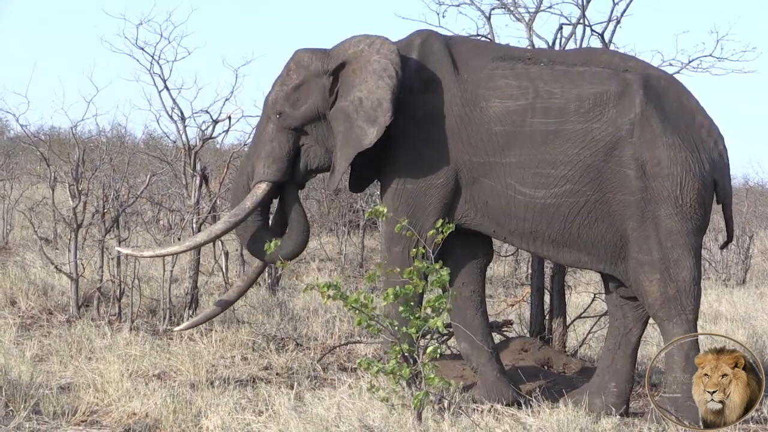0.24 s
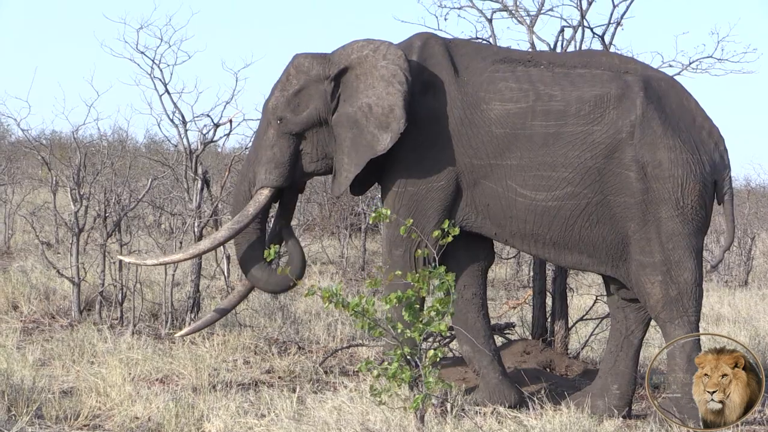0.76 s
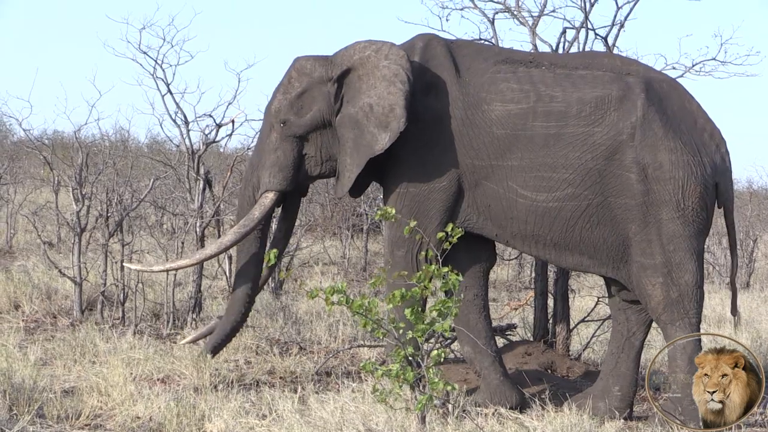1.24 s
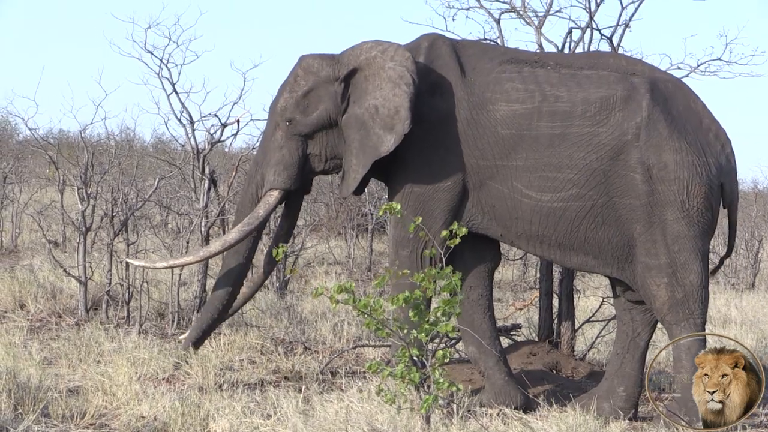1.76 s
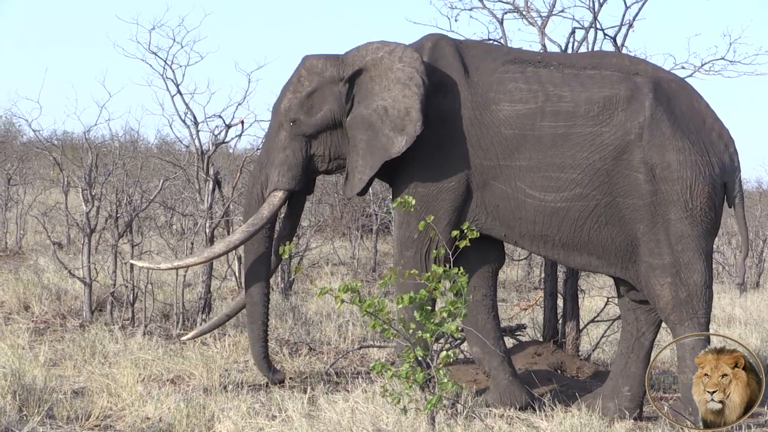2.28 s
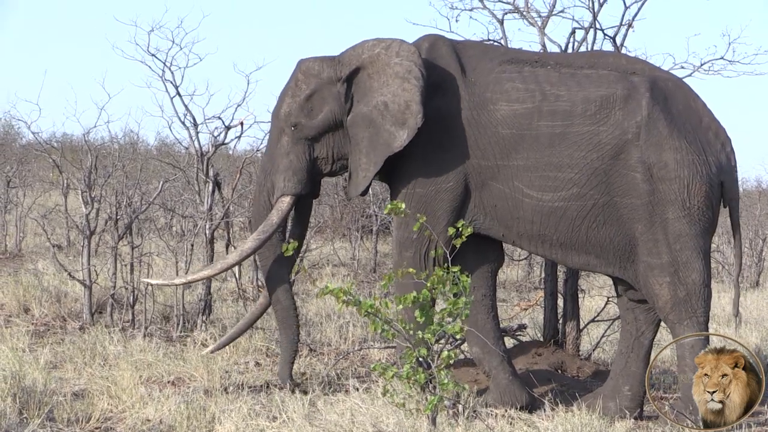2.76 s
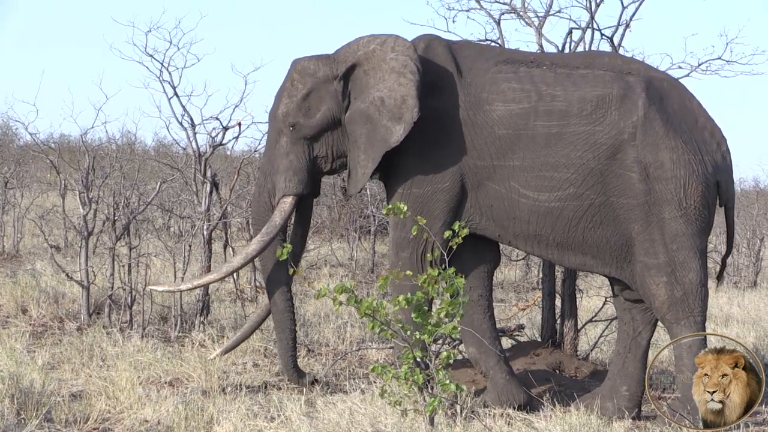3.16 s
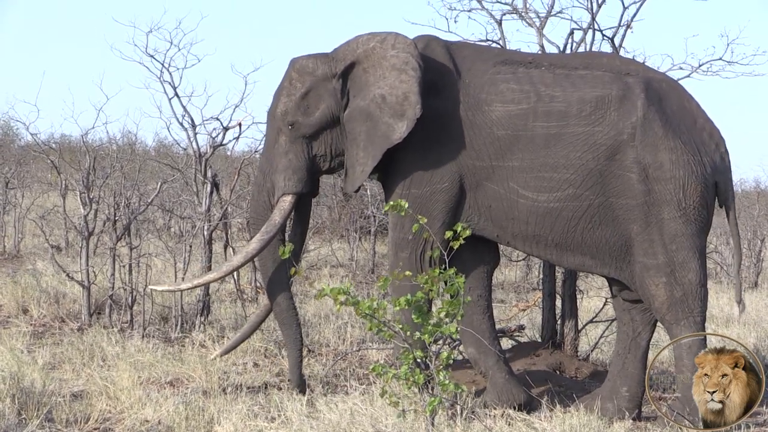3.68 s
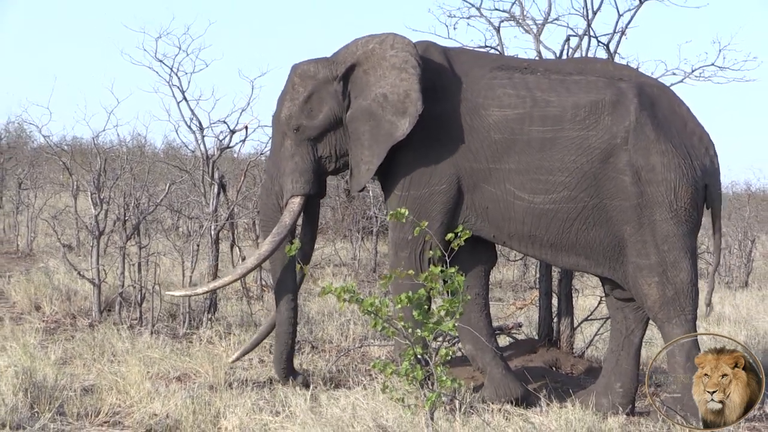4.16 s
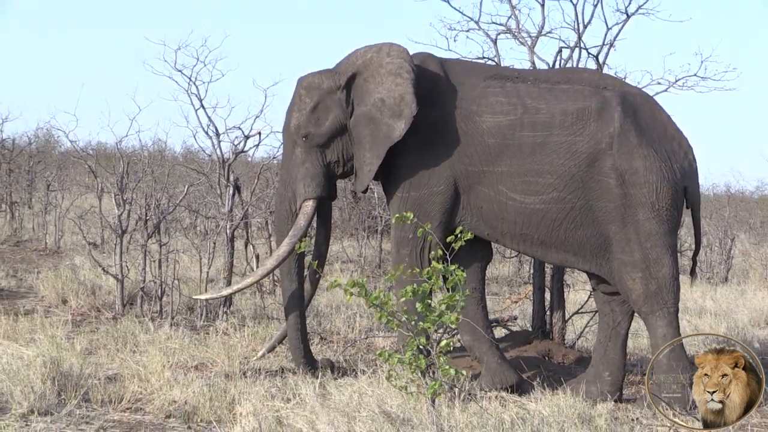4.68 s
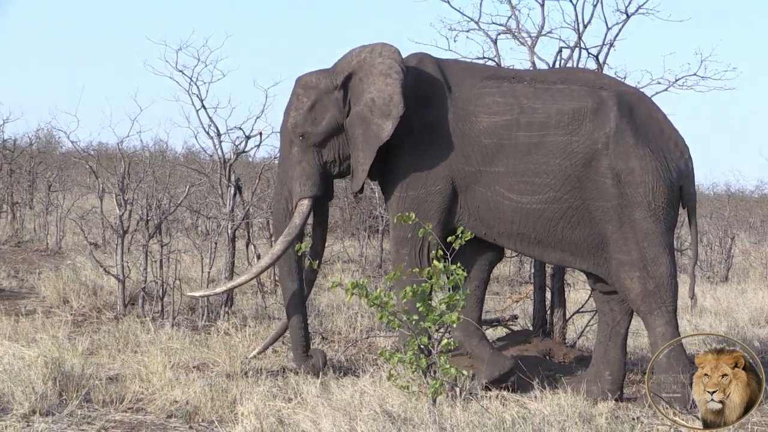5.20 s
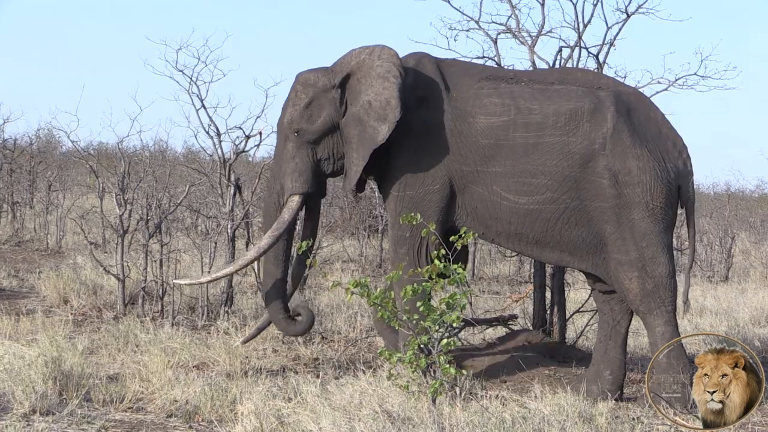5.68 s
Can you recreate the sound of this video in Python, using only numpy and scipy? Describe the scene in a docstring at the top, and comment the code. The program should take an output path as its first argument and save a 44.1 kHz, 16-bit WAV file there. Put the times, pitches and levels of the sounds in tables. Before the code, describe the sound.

A continuous shrill cicada drone dominates an open, dry scrubland with a soft airy hush. Early light wind bumps and brittle twig snaps give way to faint bird notes around the middle, then strong low gusts thump the unprotected microphone. Grass rustles quietly as an elephant feeds, and the insects grow louder towards the end. The sound is mono, with only short diffuse echoes from the thicket.

```python
"""Two near cicadas throb in dry bushland: trains of tymbal clicks excite the resonances of their bodies.
Behind them lie a far chorus and a hush of shaped noise, and a thin insect whine of wavering partials.
Wind, as coloured noise and sudden pressure swings, buffets the microphone, more strongly after a lull.
A browsing elephant brushes grass and cracks dry stalks, both filtered noise bursts; a small bird gives
faint falling whistles, gliding sines with echoes. One microphone feeds both channels."""
import sys
import numpy as np
from scipy import signal
from scipy.fft import rfft, irfft
from scipy.io import wavfile
from scipy.ndimage import uniform_filter1d

SR = 44100
rng = np.random.default_rng(int(sys.argv[2]) if len(sys.argv) > 2 else 0)


def int16_out(signal):
    """Quantize to a 16-bit WAV file."""
    q = np.round(np.clip(np.atleast_2d(signal).T, -1, 1) * 32767)
    wavfile.write(sys.argv[1], SR, q.astype(np.int16))


N = 261942
TIME = np.arange(N) / SR  # s
FREQ = np.maximum(np.arange(N // 2 + 1) * SR / N, 1)  # Hz

# Mean tempo of the near cicadas. Each row: time in seconds, throbs per second of the lower-voiced one,
# throbs per second of the higher-voiced one, tymbal clicks per second of both.
CICADA_TEMPO = [(0, 41.6, 43.4, 430), (3.2, 42.3, 43.5, 448), (3.9, 43.6, 43.5, 454), (4.8, 44, 43.7, 436),
                (5.94, 44, 44.2, 429)]


def undb(db):
    """Amplitude ratio of a level in decibels: 20 dB for each factor of ten."""
    return 10 ** (np.asarray(db) / 20)


def unit(x):
    """Normalise to unit root-mean-square amplitude."""
    return x / np.sqrt(np.mean(x ** 2))


def curve(rows, axis=1):
    """Linear interpolation in time of one column of a table."""
    rows = np.array(rows)
    return np.interp(TIME, rows[:, 0], rows[:, axis])


def walk(rate):
    """Random modulation: normal draws, rate per second, joined by lines to a spread near 1."""
    draws = rng.standard_normal(2048)  # the last draw is held if they run out
    return 1.2 * np.interp(TIME * rate, np.arange(2048), draws)


def swell(middle, half):
    """Gaussian envelope that falls to 1/e at half seconds from its middle."""
    return np.exp(-((TIME - middle) / half) ** 2)


def colour(x, points):
    """Spectral shaping: weight x by a curve of (Hz, relative dB) points over log frequency, at rms 1."""
    hz, db = np.transpose(points)
    gain = undb(np.interp(np.log(FREQ), np.log(hz), db))
    return unit(irfft(rfft(x) * gain, N))


def resonance(hz, width):
    """Complex response of two identical second-order resonators in cascade."""
    return (1 + 1j * (FREQ ** 2 - hz ** 2) / (FREQ * width)) ** -2


def ring(x, body):
    """Resonant filtering: the powers of the body's (Hz, width Hz, dB) resonances add; rms 1."""
    power = sum(np.abs(undb(db) * resonance(hz, width)) ** 2 for hz, width, db in body)
    return unit(irfft(rfft(x) * np.sqrt(power), N))


def thicket(x, t60):
    """Diffuse scattering from twigs and ground: dense echoes that fall by 60 dB in t60 seconds."""
    echoes = rng.standard_normal(N) * np.exp(-np.log(1000) * TIME / t60)
    return signal.fftconvolve(x, echoes / np.linalg.norm(echoes))[:N]


def air(mean_db=-61.5):
    """Broadband ambience: the soft hush of the open bush is coloured noise with a slow level drift."""
    # Spectrum of the hush. Each row: frequency in Hz, relative spectral level in dB.
    hush_colour = [(100, 3), (300, 10), (650, 7), (1000, 1), (1500, -4.5), (2500, -5.5), (4200, -7.5),
                   (8000, -2.5), (12500, -15), (15500, -15)]
    drift_db = .4 * walk(2)
    return colour(rng.standard_normal(N), hush_colour) * undb(mean_db + drift_db)


def wind(gust_rise=0.53, buffet_cycles=0.67, burst_db=-16, burst_hz=220):
    """Turbulent pressure on the microphone: rumbling eddies, with a push and pull in each buffet."""
    # Spectrum of the eddies. Each row: frequency in Hz, relative spectral level in dB.
    wind_colour = [(10, -15.5), (20, -3), (50, 2.5), (70, 2), (100, -4), (145, -10.5), (210, -20.5),
                   (270, -28.5), (400, -37), (700, -53.5), (1500, -59), (4000, -80)]
    # Breeze that drops to a lull, then builds. Each row: time in seconds, level in dB.
    breeze = [(0, -44.5), (.7, -41.5), (1.15, -49), (1.6, -50.5), (2.05, -41.5), (3.25, -43), (5.2, -35.5),
              (5.94, -37.5)]
    # Gusts on top of it. Each row: peak time in seconds, level in dB, 1/e fall time in seconds.
    gust_rows = [(.42, -38, .22), (1.838, -34, 0.17), (2.377, -39.5, .2), (2.9, -40.5, .16),
                 (3.482, -32.5, 0.16), (3.91, -36, 0.12), (4.19, -35, .12), (4.514, -31, 0.11),
                 (4.658, -27.5, 0.033), (4.816, -30, 0.054), (5.065, -28.5, 0.22), (5.377, -28.5, 0.13),
                 (5.72, -35.5, .15)]
    # Sudden buffets. Each row: middle in seconds, level in dB, eddy rate in Hz.
    buffets = [(.565, -27, 55), (.59, -34, 170), (1.79, -27, 85), (3.435, -27, 170), (4.517, -17, 80),
               (4.518, -19.5, 210), (5.396, -17.5, 62)]
    # Spectrum of the turbulence in a buffet. Each row: frequency in Hz, relative spectral level in dB.
    turbulence_colour = [(60, 4), (220, -2), (600, -11.5), (1000, -28), (2000, -47), (5000, -80)]

    eddies = colour(rng.standard_normal(N) * undb(2.0 * walk(30)), wind_colour)
    # the rise takes the share gust_rise of the fall time
    gusts = [undb(db) * swell(s, length * np.where(TIME < s, gust_rise, 1))
             for s, db, length in gust_rows]
    # breeze and gusts add in power
    strength = np.linalg.norm([undb(curve(breeze))] + gusts, axis=0)
    # levelling the eddies over .12 s lets the strength alone set their size
    out = strength * eddies / np.sqrt(uniform_filter1d(eddies ** 2, int(.12 * SR)))
    turbulence = undb(burst_db) * colour(rng.standard_normal(N), turbulence_colour)
    for s, db, hz in buffets:
        # the faster the buffet, the more fine turbulence it holds
        push = np.sin(2 * np.pi * hz * (TIME - s)) + turbulence * hz / burst_hz
        # grows and decays by a factor e in buffet_cycles eddy cycles
        envelope = np.exp(-np.abs(TIME - s) * hz / buffet_cycles)
        out = out + undb(db) * envelope * push
    return out


def whine(rate_hz=1051, jitter=0.00308, flutter_db=2.0):
    """Harmonic series of a far insect: partials share one wavering phase but flutter separately."""
    # Partials. Each row: multiple of the rate, mean rms level in dB.
    partials = [(1, -82.5), (7, -65), (8, -64), (9, -69), (10, -78), (11, -84)]
    phase = 2 * np.pi * np.cumsum(rate_hz * (1 + jitter * walk(150))) / SR
    # the root of 2 turns rms into sine amplitude
    return sum(np.sqrt(2) * undb(db + flutter_db * walk(40)) * np.sin(k * phase)
               for k, db in partials)


def far_chorus():
    """Incoherent superposition: many far cicadas merge into a shimmering band of resonant noise."""
    # Swelling and sinking of the chorus. Each row: time in seconds, level in dB.
    chorus_level = [(0, -53), (.9, -55), (2.0, -51.5), (3.7, -49.5), (5.1, -52.5), (5.55, -49), (5.94, -50)]
    # Body resonances. Each row: frequency in Hz, width in Hz, relative gain in dB.
    chorus_body = [(7240, 280, 0.5), (7800, 210, 0.5), (8610, 1060, 1)]
    shimmer = undb(0.41 * walk(25))
    return ring(rng.standard_normal(N), chorus_body) * shimmer * undb(curve(chorus_level))


def grass(grain_db=3, relative_width=1.47):
    """Frictional noise: dry blades brushed by trunk and feet scrape in short swells of grainy noise."""
    # Brushes. Each row: middle in seconds, 1/e half length in seconds, level in dB, pitch in Hz.
    brushes = [(1.025, 0.23, -64, 2600), (2.53, 0.23, -65.5, 2380), (2.945, 0.045, -68.5, 3300),
               (3.248, 0.052, -63, 2940), (3.44, 0.094, -68.5, 2190), (3.72, 0.13, -69, 3000),
               (4.505, 0.14, -69.5, 2980), (4.94, .1, -60.5, 2030)]
    out = np.zeros(N)
    for s, half, db, hz in brushes:
        blades = rng.standard_normal(N) * undb(grain_db * walk(400))
        band = [(hz, relative_width * hz, 0)]
        out += ring(blades, band) * undb(db) * swell(s, half)
    return out


def stalks(spread=1.0, grain_db=4, strain_db=-17, strain_s=0.028, echo_db=-11, t60=0.55):
    """Brittle fracture: fibres creak under strain, then snap in a decaying, uneven burst that rings."""
    # Breaks. Each row: snap time in seconds, direct peak in dB, pitch in Hz, 1/e decay in seconds.
    breaks = [(.384, -49, 3080, 0.041), (1.151, -48.5, 2190, .016), (1.432, -51, 2780, 0.017),
              (1.595, -45, 3900, .007), (1.598, -44.5, 2040, 0.0032), (1.633, -41, 3300, .006),
              (2.082, -55.5, 2700, .009), (2.108, -51.5, 2420, .008), (3.713, -52.5, 1650, 0.065),
              (5.731, -52, 1170, 0.015), (5.878, -45, 2640, 0.0086)]
    out = np.zeros(N)
    for s, db, hz, length in breaks:
        age = np.abs(TIME - s)
        fracture = (TIME >= s) * np.exp(-age / length)
        strain = undb(strain_db) * np.exp(-age / strain_s)  # on both sides of the snap
        fibres = rng.standard_normal(N) * undb(grain_db * walk(330)) * (fracture + strain)
        snap = irfft(rfft(fibres) * resonance(hz, spread * hz), N)
        out += undb(db) * snap / np.abs(snap).max()
    return out + undb(echo_db) * thicket(out, t60)


def bird(distance_db=-2.5, echo_db=-9):
    """Frequency modulation: thin sine whistles and pips glide down, with faint thicket echoes."""
    # Falling whistles. Each row: start in seconds, start pitch in Hz, peak in dB before distance loss.
    slurs = [(1.89, 2680, -69), (2.38, 2750, -66), (3.42, 2620, -63), (3.545, 2620, -64), (3.87, 2780, -68),
             (3.945, 2600, -64), (4.06, 2600, -66)]
    # Short, lower pips. Each row: start in seconds, start pitch in Hz, peak in dB before distance loss.
    pips = [(2.3, 2040, -69), (3.01, 2030, -67), (4.705, 2230, -63.5), (5.23, 2010, -66.5),
            (5.435, 2180, -66.5)]
    song = np.zeros(N)
    waver = 1 + .016 * walk(220)
    # notes, length in seconds, fall in Hz
    for notes, length, fall_hz in (slurs, .075, 270), (pips, .048, 70):
        for s, start_hz, db in notes:
            part = np.clip((TIME - s) / length, 0, 1)
            hz = (start_hz - fall_hz * part) * waver
            whistle = np.sin(2 * np.pi * np.cumsum(hz) / SR)
            song += undb(db) * np.sin(np.pi * part) * whistle
    return undb(distance_db) * (song + undb(echo_db) * thicket(song, t60=0.46))


def cicada(level_db, throbs, body, sharpness, jitter, crackle_db, scatter_db, scatter_s):
    """Forced resonance: tymbal ribs buckle in a fast, throbbing train that rings the abdomen."""
    throb_phase = 2 * np.pi * np.cumsum(throbs * (1 + .005 * walk(15))) / SR
    throb = (.5 + .5 * np.cos(throb_phase)) ** sharpness
    rate = curve(CICADA_TEMPO, axis=3) * (1 + jitter * walk(60))
    ribs = np.cumsum(rate) / SR  # buckling cycles so far
    # each buckle is a band-limited click and a crackle that weakens through its cycle
    clicks = unit(np.sinc(((ribs + .5) % 1 - .5) * SR / rate))
    crackle = unit(np.exp(-(ribs % 1) / 1.8) * rng.standard_normal(N))
    tymbal = (clicks + undb(crackle_db) * crackle) * throb
    # twigs and ground scatter the song and soften the throbs
    scattered = undb(scatter_db) * thicket(tymbal, scatter_s)
    return ring(tymbal + scattered, body) * undb(level_db)


def near_cicadas():
    """Superposed pulse trains: two cicadas in nearby trees throb at slightly different rates."""
    # Lower voice. Each row: time in seconds, level in dB, upward shift of its resonances in Hz.
    low_song = [(0, -56.5, 168.5), (.6, -58, 20), (3.5, -54.5, -10), (4.5, -58.5, 482), (5.2, -56.5, 380.5),
                (5.94, -54.5, 249)]
    # Higher voice, louder towards the end. Each row: time in seconds, level in dB before surges.
    high_song = [(0, -57), (2.2, -58.5), (4.0, -55), (4.2, -51), (5.94, -49)]
    # Its brief surges of effort. Each row: middle in seconds, 1/e half length in seconds, gain in dB.
    surges = [(.08, .2, 5), (1.8, 0.087, 6), (4.768, .17, 5)]
    # Body resonances, lower voice before its shift.
    # Each row: frequency in Hz, width in Hz, relative gain in dB.
    low_body = [(4980, 230, -16), (6150, 460, -5), (6440, 300, 1.5), (7395, 920, 3.5)]
    high_body = [(7910, 1490, -4), (8710, 880, -1.5), (9400, 460, -4), (9850, 400, -8), (10370, 570, -25),
                 (10840, 80, -15), (11700, 600, -39)]

    low = cicada(curve(low_song), curve(CICADA_TEMPO), low_body, sharpness=.7, jitter=.012,
                 crackle_db=4.5, scatter_db=-9, scatter_s=.1)
    effort_db = curve(high_song) + sum(db * swell(s, half) for s, half, db in surges)
    high = cicada(effort_db, curve(CICADA_TEMPO, axis=2), high_body, sharpness=.55, jitter=.006,
                  crackle_db=1.5, scatter_db=-10, scatter_s=.1)
    # the lower one flexes its abdomen, which retunes its resonances: a single-sideband shift
    flex = np.exp(2j * np.pi * np.cumsum(curve(low_song, axis=2)) / SR)
    return np.real(signal.hilbert(low) * flex) + high


def scene():
    """Linear superposition: the pressures of all sources add at one microphone."""
    background = air() + wind() + whine() + far_chorus()
    mono = background + grass() + stalks() + bird() + near_cicadas()
    return np.array([mono, mono])


def record(dry, top_hz=15300):
    """Band limiting: a tenth-order elliptic low-pass cuts the top steeply."""
    lowpass = signal.ellip(10, .1, 80, top_hz, fs=SR, output="sos")
    return signal.sosfilt(lowpass, dry)


dry = scene()
out = record(dry)
int16_out(out)
```